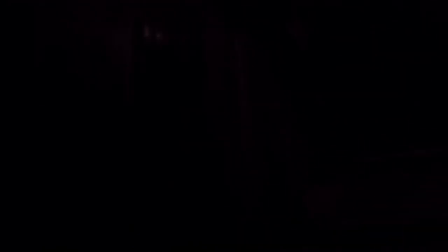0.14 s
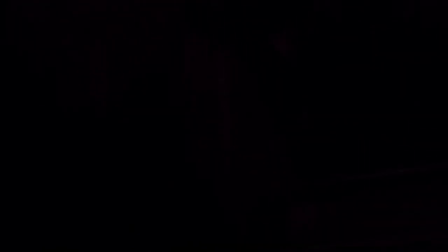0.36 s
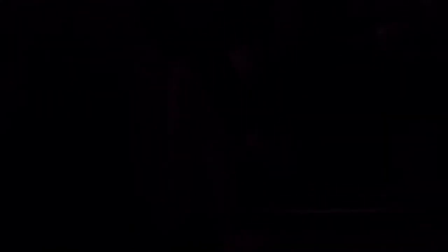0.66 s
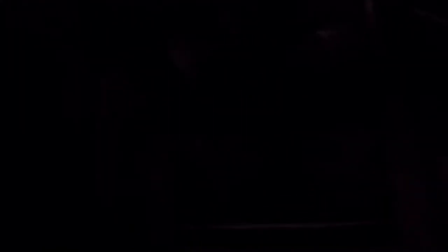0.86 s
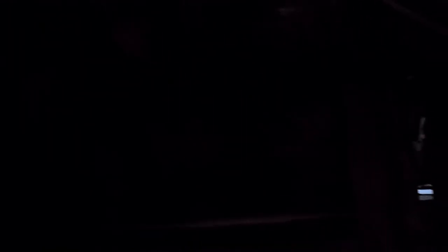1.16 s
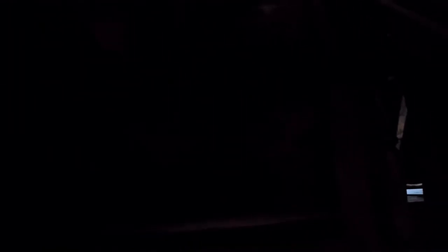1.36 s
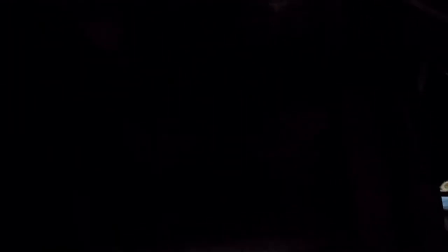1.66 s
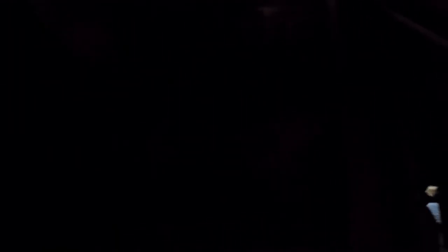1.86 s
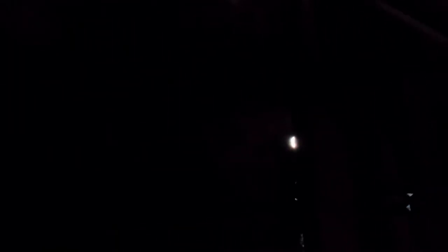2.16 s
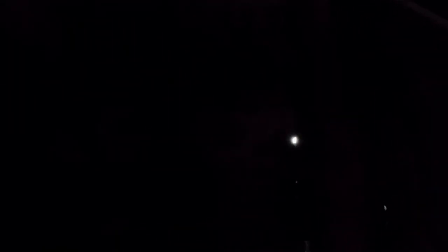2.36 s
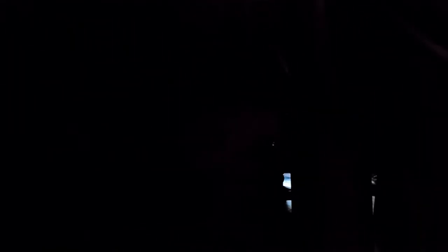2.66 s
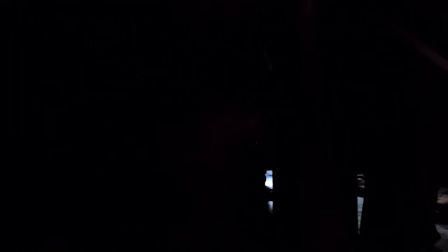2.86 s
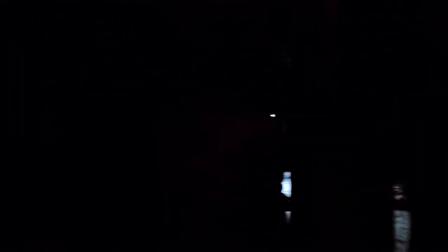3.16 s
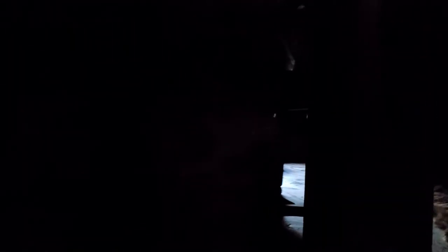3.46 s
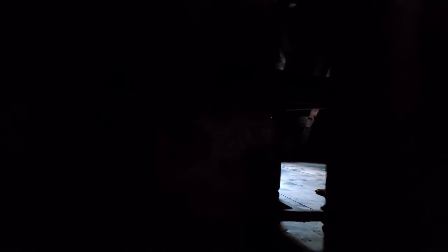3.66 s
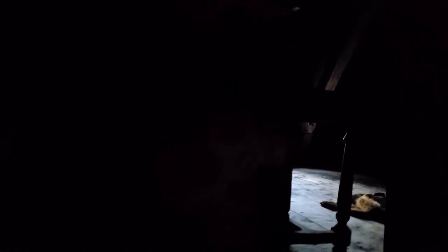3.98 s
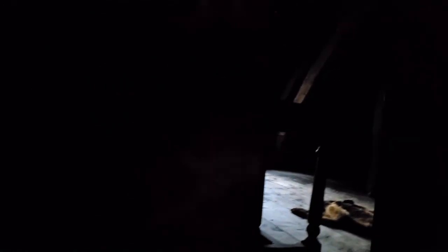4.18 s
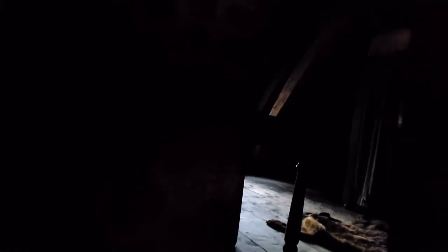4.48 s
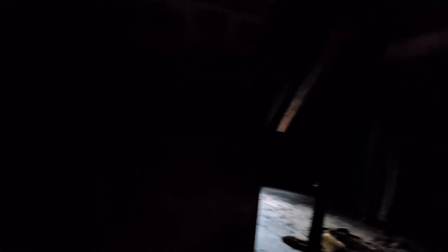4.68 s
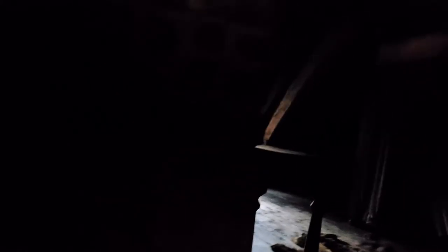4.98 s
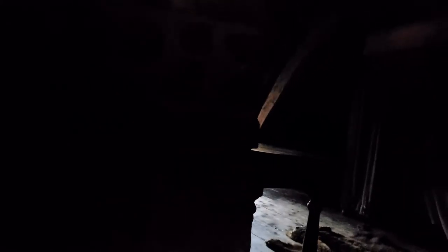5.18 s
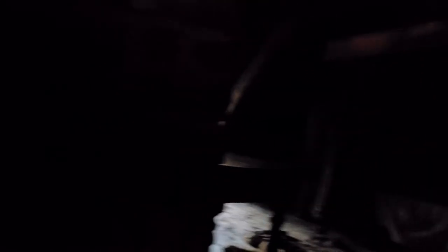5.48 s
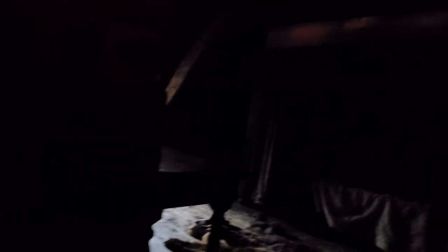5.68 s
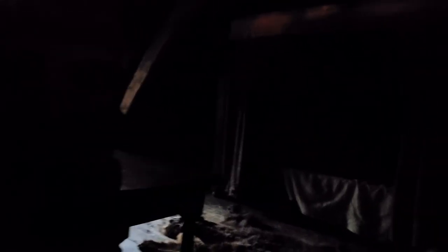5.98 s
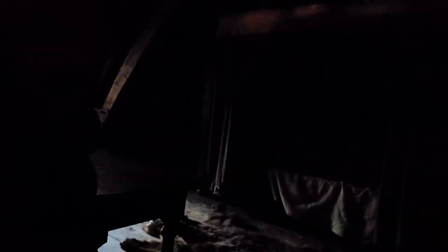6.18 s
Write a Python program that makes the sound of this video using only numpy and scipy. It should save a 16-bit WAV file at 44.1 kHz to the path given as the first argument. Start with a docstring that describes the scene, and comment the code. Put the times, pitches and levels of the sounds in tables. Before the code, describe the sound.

Someone walks up a dark wooden staircase in an old building. Each step is a loose cluster of low boom, dull thud and woody knock, with rubbing soles and dry crackling grit. Steps are busiest early, then more separated, ending on softer contacts. Close handheld pickup, short wooden reverberation, faint low room hush and soft fabric rustle, brighter on the right.

```python
"""A faint boom and a tick come first, then heavy shoes climb an old wooden staircase in a bare stairwell,
close below a handheld camera. Each contact excites damped modes: the frame booms, the tread thuds and
knocks, and the sole slaps. Soles scuff by grainy friction; grit and dry joints tick as short noise bursts.
Clothes hiss after each step over the quiet of the building. Decaying noise gives the stairwell's tail.
The right microphone port faces the stairs and hears more treble."""
import sys
import numpy as np
from scipy import signal
from scipy.fft import rfft, irfft, next_fast_len
from scipy.io import wavfile
from scipy.ndimage import uniform_filter1d

SR = 44100
rng = np.random.default_rng(int(sys.argv[2]) if len(sys.argv) > 2 else 0)


def materialize(psi):
    """Save the field psi as 16-bit PCM at rate SR to the path in sys.argv[1].

    A 1-D psi becomes a single channel; in a 2-D psi each row is a channel.
    """
    bounded = np.clip(np.atleast_2d(psi).T, -1, 1)
    quanta = np.round(bounded * 32767).astype(np.int16)
    wavfile.write(sys.argv[1], SR, quanta)


N = 279153  # length [samples]
TOP_HZ = 15900  # upper band limit

# Shoe contacts, peaks before the stairwell's tail:
# (time [s], boom [dB], thud [dB], knock [dB], slap [dB], landing time constant [s])
CONTACTS = [(0.002, -37, -49, -42.5, -44, 0.00031), (0.124, -55, -44, -55, -65, 0.0084),
            (0.487, -9, -19.5, -17, -29.5, 0.00095), (0.512, -42, -27.5, -17.5, -48, 0.0012),
            (0.553, -24, -36, -26.5, -33.5, .0004), (0.624, -22, -49, -29.5, -41, 0.00044),
            (0.655, -33.5, -43.5, -36.5, -61, 0.026), (0.75, -36, -46.5, -38, -41.5, 0.015),
            (0.948, -44, -45, -45, -50, 0.012), (1.116, -52, -46.5, -36.5, -47.5, 0.0084),
            (1.29, -30, -28, -37, -43, 0.00091), (1.338, -40, -36, -49.5, -68, 0.0098),
            (1.506, -21.5, -20, -26.5, -24.5, 0.00018), (1.552, -45, -24.5, -25, -29, 0.0016),
            (1.598, -36, -16.5, -27, -27.5, 0.0003), (1.636, -44, -23, -32, -31.5, 0.001),
            (1.722, -29, -22, -24, -22.5, 0.0017), (2.069, -49, -20.5, -29, -30.5, 0.00075),
            (2.101, -54, -21.5, -53, -43, 0.0035), (2.137, -29, -33, -25.5, -32, 0.0023),
            (2.168, -44, -22.5, -32.5, -32.5, 0.00032), (2.2, -58, -26.5, -34, -43, 0.0041),
            (2.351, -28, -36.5, -42, -49, 0.019), (2.382, -27.5, -23.5, -31.5, -38.5, 0.015),
            (2.438, -23, -29, -28.5, -34.5, 0.0089), (2.51, -23, -39.5, -49, -45, .004),
            (2.755, -35, -34, -50, -60.5, 0.0048), (2.827, -40, -39.5, -46, -63, 0.0022),
            (2.983, -34.5, -23.5, -20.5, -32.5, 0.001), (3.008, -36, -29.5, -31, -34, 0.00078),
            (3.049, -27.5, -30.5, -37.5, -64, 0.0016), (3.107, -33, -34, -33.5, -44.5, 0.011),
            (3.15, -36, -40, -41, -45.5, 0.023), (3.75, -55, -67, -48.5, -60, 0.0047),
            (3.783, -28, -13, -23, -26, .0008), (3.809, -32, -24, -28, -38, .0004),
            (3.85, -32.5, -60, -39, -43, 0.0028), (3.923, -34.5, -31.5, -29.5, -36.5, 0.00067),
            (4.152, -43.5, -41, -30, -30.5, 0.00078), (4.443, -56, -41.5, -35.5, -30, 0.003),
            (4.511, -41, -18.5, -17.5, -26.5, 0.0017), (4.534, -33, -33, -31, -35, 0.00097),
            (4.638, -32, -28.5, -33.5, -32, 0.0004), (4.772, -35, -39, -36, -43, .018),
            (5.305, -48, -33, -33, -40, 0.0013), (5.34, -42, -33, -40, -37.5, 0.0029),
            (5.397, -29.5, -30, -24, -36.5, 0.004), (5.581, -51, -71, -46.5, -54.5, 0.0025),
            (6.096, -37.5, -34, -28.5, -35.5, .0007), (6.256, -58, -50, -40, -46, 0.0012),
            (6.265, -31, -26, -21, -30, 0.00087)]
# The tread under the foot from a given time on; ring scales the decay of every mode:
# (time [s], boom [Hz], thud [Hz], knock [Hz], ring t60 [s], slap t60 [s], grit relative to slap [dB])
TREADS = [(0, 67, 101, 312, 0.17, .08, 9.5), (.48, 81.4, 173, 310, 0.25, 0.1, -9.5),
          (.9, 74, 179, 476, 0.086, 0.17, -2), (1.25, 60, 110, 612, 0.34, 0.058, -6),
          (1.5, 71, 113.4, 475, 0.11, 0.038, -5.5), (1.63, 69, 228, 488, 0.053, 0.039, 1.5),
          (2.0, 74.5, 116.4, 424, 0.16, 0.09, -0.5), (2.3, 59, 170, 554, 0.19, 0.076, -11.5),
          (2.7, 58, 104, 358, 0.097, 0.21, 9), (2.9, 63, 150.3, 441, 0.18, 0.088, -0.5),
          (3.7, 92, 188, 325, .1, 0.077, -13.5), (3.9, 80.6, 198, 519, 0.58, 0.062, -1.5),
          (4.1, 59, 163, 373, 0.11, .14, -2), (4.4, 82.2, 166, 773, 0.11, 0.086, -0.5),
          (4.6, 72.5, 216, 437, 0.18, 0.13, -4), (5.2, 76.6, 243, 448, 0.087, 0.095, -2.5),
          (6.0, 80.2, 126, 488, 0.27, 0.084, -16), (6.2, 59.4, 172, 690, 0.077, 0.061, -25)]
# Modes shared by the whole staircase: (mean frequency [Hz], mean relative level [dB], t60 at a ring of 0.2 s [s])
STAIR_MODES = [(48, -10, .35), (63, -8, .35), (86, -8, .35), (115, -7, .25), (150, -8, .2), (197, -6, .2),
               (240, -9, .17), (312, -7, .2), (365, -8, .14), (410, -9, .14), (490, -11, .13),
               (560, -14, .12), (640, -16, .12), (740, -18, .1), (860, -20, .1)]
# Band edges that part boom, thud, knock, slap and grit: (frequency [Hz])
PART_EDGES_HZ = [30, 100, 300, 1000, 4000, 16000]
# Colour of sole against board: (frequency [Hz], relative level [dB])
SLAP_COLOUR = [(150, -1.5), (300, -2.5), (600, -5.5), (1300, -7.5), (3000, -17.5), (5800, -40.5),
               (8500, -31), (12300, -55), (16000, -52)]


def footfalls():
    """Modal excitation: a contact rings the shared modes and three tread notes, with slap noise on top."""
    track = np.zeros((2, N))
    t = np.arange(SR // 3) / SR
    mode_hz, mode_db, mode_t60 = np.transpose(STAIR_MODES)
    for start, *levels_db, landing in CONTACTS:
        tread = [row for row in TREADS if row[0] <= start][-1]
        _, boom_hz, thud_hz, knock_hz, ring, slap_t60, grit_db = tread
        ring = np.clip(ring, .02, .4)
        landing = np.clip(landing, .0003, .02)
        slap_t60 = np.clip(slap_t60, .01, .2)

        # shared modes are detuned, and all levels varied, afresh for each contact and channel
        shared_hz = mode_hz * (1 + 0.045 * rng.standard_normal((2, len(mode_hz))))
        hz = np.append(shared_hz, [[boom_hz, thud_hz, knock_hz]] * 2, axis=1)[..., None]
        level_db = np.append(mode_db, [1, 3, -1]) + 4.0 * rng.standard_normal(hz.shape[:2])
        size = amp(level_db)[..., None]
        t60 = ring * np.append(mode_t60 / .2, [1.7, .9, .45])[:, None]

        # a heel lands at once, a rolling sole takes some milliseconds
        rise = 1 - np.exp(-t / landing)
        modes = size * amp(-60 * t / t60) * np.sin(2 * np.pi * hz * t)
        wood = rise * np.sum(modes, axis=1)

        # the sole meets the board in uneven little contacts
        chatter = amp(3.3 * unit(uniform_filter1d(rng.standard_normal(len(t)), size=130)))
        slap = noise(SLAP_COLOUR, len(t)) * chatter * amp(-60 * t / slap_t60) * rise
        body = unit(wood) + amp(-4) * unit(slap)

        # each part of the wood gathers around its note; slap and grit are noise alone
        notes = [(boom_hz, 1.5), (thud_hz, .9), (knock_hz, .8)]
        sources = [filtered(body, hump(*note)) for note in notes] + [slap, slap]
        peaks_db = [*levels_db, levels_db[-1] + grit_db]
        blow = 0
        for k, (source, peak_db) in enumerate(zip(sources, peaks_db)):
            part = filtered(source, band(*PART_EDGES_HZ[k:k + 2]))
            blow = blow + amp(peak_db) * part / np.abs(part).max(axis=1, keepdims=True)
        add(track, start, stairwell(blow, wet_db=-5.5))
    return track


# Soles dragging over the wood, levels before the fades and the change over the stroke:
# (time [s], rub length [s], rub rms [dB], dust rms [dB], change over the stroke [dB])
SCUFFS = [(1.462, 0.079, -47.5, -64, 4), (1.595, .12, -31.5, -63, -9), (2.081, .17, -35, -55.5, -3),
          (2.394, .12, -40, -65, -4), (2.985, 0.08, -30, -55, -14), (3.939, .19, -37.5, -84, 1.5),
          (4.454, 0.059, -34.5, -68, -6), (4.634, 0.064, -35, -58, -2.5), (4.778, 0.059, -45, -51, -12),
          (5.302, .13, -45.5, -60.5, -6.5), (6.1, .15, -44, -68, -6.5)]
# Colour of the rub: (frequency [Hz], relative level [dB])
RUB_COLOUR = [(210, 2), (350, -9), (541, -8.5), (824, -10.5), (944, -16.5), (1970, -17), (2190, -17.5),
              (2760, -24), (9000, -37), (11700, -66), (19800, -120)]
# Colour of the dust: (frequency [Hz], relative level [dB])
DUST_COLOUR = [(7000, -17), (10000, 10), (13000, 1), (16000, -1)]
DRAG_ATTACK_S, DRAG_RELEASE_S = 0.0079, 0.045  # soft edges of a stroke
DUST_LINGERS = 1.33  # dust length as a multiple of rub length


def scuffs():
    """Friction noise: grainy rubbing of the sole on wood, and the longer fine hiss of dust."""
    track = np.zeros((2, N))
    for start, length, rub_db, dust_db, change_db in SCUFFS:
        rub = (rub_db, length, RUB_COLOUR, 3, -7)
        dust = (dust_db, length * DUST_LINGERS, DUST_COLOUR, 1.2, -12)
        for level_db, lasts, colour, grain_db, wet_db in [rub, dust]:
            t = np.arange(0, lasts, 1 / SR)
            fades = np.minimum(t / DRAG_ATTACK_S, (lasts - t) / DRAG_RELEASE_S)
            stroke = np.clip(fades, 0, 1) * amp(change_db * t / lasts)
            grain = amp(grain_db * unit(uniform_filter1d(rng.standard_normal(len(t)), size=90)))
            friction = unit(grain * noise(colour, len(t)))
            add(track, start, stairwell(stroke * amp(level_db) * friction, wet_db))
    return track


# Grit and dry joints, peaks before the stairwell's tail: (time [s], peak [dB], centre frequency [Hz])
TICKS = [(0.048, -32.5, 5700), (0.391, -48, 3840), (0.579, -42, 3340), (0.663, -46, 4300),
         (0.702, -36, 2700), (0.768, -37, 1550), (0.778, -67, 3070), (0.797, -41, 1550), (1.366, -42, 4870),
         (1.422, -35.5, 4500), (1.479, -33.5, 3530), (1.489, -36, 4070), (1.506, -22.5, 5400),
         (1.61, -33, 2600), (1.665, -35, 3770), (1.705, -37, 4630), (2.071, -32, 3300),
         (2.141, -35.5, 3300), (2.17, -48, 3300), (2.37, -43, 3820), (2.444, -39, 2500), (2.464, -54, 2640),
         (2.565, -44.5, 3960), (3.314, -36, 3400), (3.452, -47, 3034), (3.828, -34, 2940),
         (3.883, -43.5, 3770), (3.963, -33, 2580), (4.035, -34, 2860), (4.601, -36.5, 5400),
         (4.647, -26.5, 2900), (4.667, -26, 3370), (4.792, -33.5, 6240), (5.158, -52.5, 2000),
         (5.438, -46, 3420), (5.533, -42.5, 3650), (5.682, -30.5, 3500), (6.227, -52, 2000),
         (6.295, -39, 2910)]
TICK_T60_S = 0.032  # decay of the noise that excites the resonance


def ticks():
    """Impulsive resonance: a short decaying noise burst is spread around the pitch of each crack."""
    track = np.zeros((2, N))
    t = np.arange(SR // 16) / SR
    for start, peak_db, hz in TICKS:
        burst = rng.standard_normal((2, len(t))) * amp(-60 * t / TICK_T60_S)
        snap = filtered(filtered(burst, hump(hz, width=.45)), band(867, TOP_HZ))
        add(track, start, stairwell(amp(peak_db) * snap / np.abs(snap).max(), wet_db=-9))
    return track


# Each step swings a leg and its clothes: (start time [s], greatest rustle level [dB])
STRIDES = [(-.15, -57), (0.492, -53.5), (1.252, -58.5), (1.55, -67.5), (2.07, -61), (2.4, -65.5),
           (2.98, -54), (3.78, -58.5), (4.45, -58), (5.3, -56.5), (6.1, -60)]
# Colour of the clothes: (frequency [Hz], relative level [dB])
CLOTHES_COLOUR = [(500, 0), (900, 1.5), (1300, 8.5), (3000, 4.5), (5500, -4), (8300, 6), (12000, -8.5),
                  (16000, -9.5)]
# Colour of the quiet building: (frequency [Hz], relative level [dB])
QUIET_COLOUR = [(15, -22), (28, 2.5), (70, 3.5), (161, -11.5), (476, -13), (936, -22.5), (1440, -24.5),
                (3430, -20.5), (6560, -27.5), (11600, -28.5), (16000, -42)]
SWING_S, STILL_DB = .15, -76  # time to the height of a rustle; steady hiss beneath the rustles
QUIET_DB = -64  # rms of the quiet building


def air():
    """Stationary and modulated noise: the quiet building, and clothes whose hiss swells after each step."""
    start, rustle_db = np.transpose(STRIDES)[..., None]
    u = np.clip(np.arange(N) / SR - start, 0, None) / SWING_S
    swells = amp(rustle_db) * u * np.exp(1 - u)  # each is greatest at u = 1
    rustle = amp(STILL_DB) + np.sum(swells, axis=0)
    return amp(QUIET_DB) * noise(QUIET_COLOUR, N) + rustle * noise(CLOTHES_COLOUR, N)


# Reverberation of the stairwell: (frequency [Hz], t60 [s])
WELL_DECAY = [(50, 0.34), (200, 0.46), (800, 0.37), (3000, 0.21), (12000, 0.22)]


def stairwell(x, wet_db):
    """Diffuse reverberation: convolution with fresh noise in which each frequency dies at its own speed."""
    hz, t, cells = signal.stft(rng.standard_normal((2, SR * 3 // 4)), SR, nperseg=512)
    decay = amp(-60 * t / along(WELL_DECAY, hz)[:, None])
    tail = signal.istft(cells * decay, SR, nperseg=512)[1]
    onset = np.clip(np.arange(tail.shape[1]) / (0.0049 * SR), 0, 1)  # 4.9 ms build-up
    tail = tail * onset / np.linalg.norm(tail[0])
    wet = signal.fftconvolve(x, tail, axes=1)
    direct = np.pad(x, ((0, 0), (0, wet.shape[1] - x.shape[1])))
    return direct + amp(wet_db) * wet


def amp(db):
    """Decibel law: the amplitude gain of a level in dB."""
    return 10 ** (np.asarray(db) / 20)


def unit(x):
    """Power normalisation: x at rms 1 over all its channels."""
    return x / np.sqrt(np.mean(x ** 2) + 1e-20)


def along(points, hz):
    """Logarithmic frequency scale: interpolate (frequency [Hz], value) points."""
    f, value = np.transpose(points)
    return np.interp(np.log(hz + 1), np.log(f + 1), value)


def filtered(x, response):
    """Linear filtering: multiply the spectrum of x by a complex response of frequency."""
    m = 2 * next_fast_len(x.shape[-1] // 2 + 4096)  # even, zero-padded length
    spectrum = rfft(x, m) * response(np.fft.rfftfreq(m, 1 / SR))
    return irfft(spectrum, m)[..., :x.shape[-1]]


def band(lo_hz, hi_hz):
    """Causal band-pass: cascaded second-order sections, 24 dB an octave on each side."""
    section = lambda u: 1 / (1 + np.sqrt(2) * u + u * u)
    return lambda f: (section(1j * f / hi_hz) * section(lo_hz / (1j * f + 1e-9))) ** 2


def hump(hz, width):
    """Damped resonance: gain 1 at hz, bandwidth as a share of hz."""
    return lambda f: 1j * f * hz * width / (hz * hz - f * f + 1j * f * hz * width)


def causal(gain):
    """Minimum phase: fold the cepstrum of a gain so its response starts no sooner than its cause."""
    cepstrum = irfft(np.log(gain + 1e-6))
    half = cepstrum.shape[-1] // 2
    forward = cepstrum * (np.arange(2 * half) < half)
    return np.exp(2 * rfft(forward, 2 * half) - cepstrum[..., :1])


def noise(spectrum, size):
    """Spectral shaping: two unrelated noises of one colour, rms 1 together."""
    white = rng.standard_normal((2, size))
    return unit(filtered(white, lambda f: amp(along(spectrum, f))))


def add(track, s, sound):
    """Superposition: mix a sound into a track at time s, cut at the track's end."""
    part = track[:, round(s * SR):][:, :sound.shape[1]]
    part += sound[:, :part.shape[1]]


# Likeness of the two ports: (frequency [Hz], left-right correlation [-1 to 1])
LIKENESS = [(60, .998), (180, .993), (350, .9), (700, .65), (1400, .15), (4000, 0), (9000, .45),
            (15000, .5)]
# Balance of the two ports: (frequency [Hz], left minus right [dB])
BALANCE = [(60, 0), (300, -.8), (700, -1.2), (1400, -5.5), (2800, -8), (5500, -9.5), (9500, -4),
           (14000, -5)]


def scene():
    """Interchannel coherence: the ports agree in the bass, and differ and lean right in the treble."""
    pair = footfalls() + ticks() + scuffs() + air()
    # cos^2 - sin^2 of half the angle gives the wanted correlation
    angle = lambda f: np.arccos(np.clip(along(LIKENESS, f), -1, 1)) / 2
    mid, side = filtered(pair, lambda f: causal(np.array([np.cos(angle(f)), np.sin(angle(f))])))
    ports = np.array([mid + side, mid - side])
    return filtered(ports, lambda f: causal(amp(np.outer([.5, -.5], along(BALANCE, f)))))


# Treble response of the microphone ports, with a dip: (frequency [Hz], gain [dB])
PORT_GAIN = [(6500, 1), (8200, -14.5), (9800, -8), (11500, 2)]
LOW_HZ = 43.7  # corner of each of three bass roll-offs


def record(dry):
    """Band limitation: the camera colours the treble, rolls off deep bass and cuts steeply above its limit."""
    colour = filtered(dry, lambda f: causal(amp(along(PORT_GAIN, f))))
    bass_cut = lambda f: (1j * f / (LOW_HZ + 1j * f)) ** 3
    return filtered(colour, lambda f: bass_cut(f) / (1 + (f / TOP_HZ) ** 80))


dry = scene()
out = record(dry)
materialize(out)
```